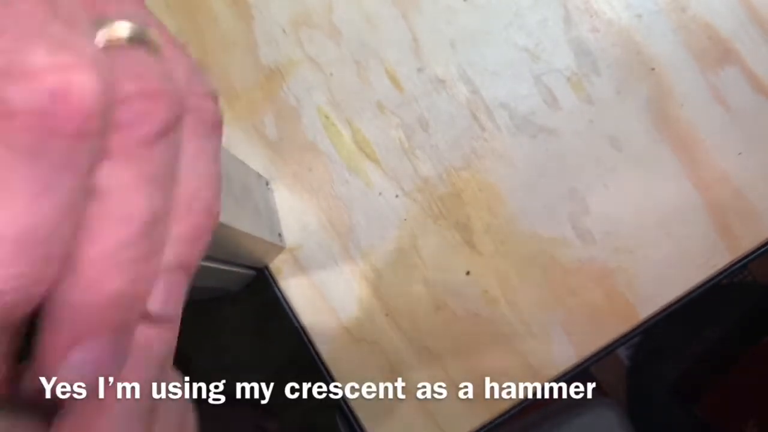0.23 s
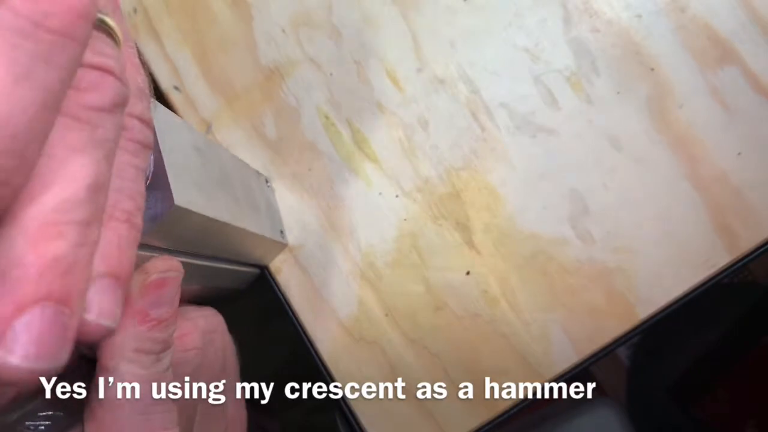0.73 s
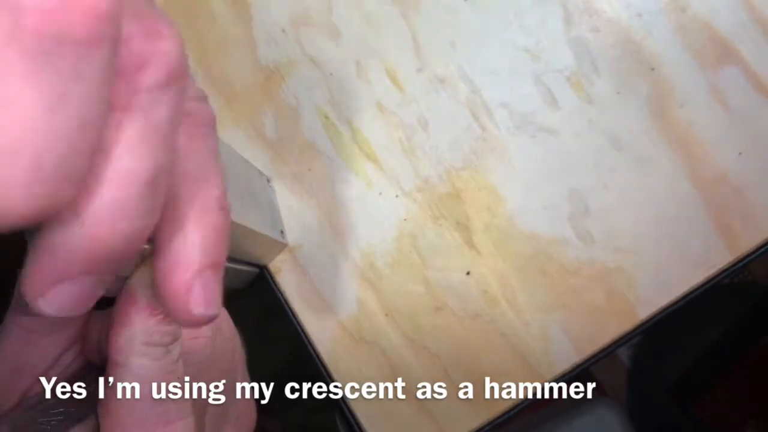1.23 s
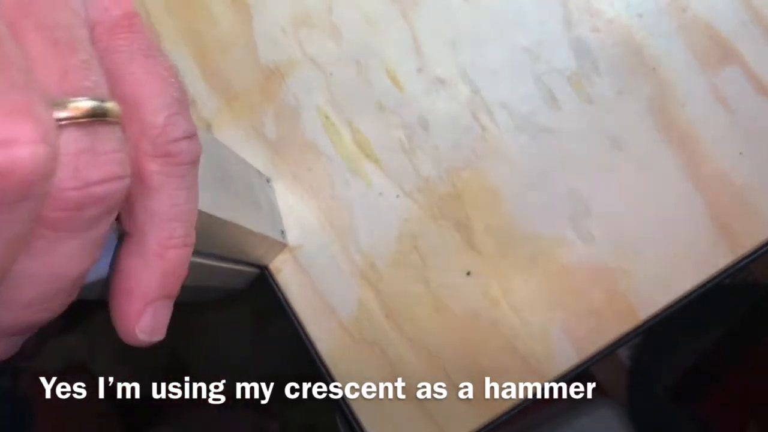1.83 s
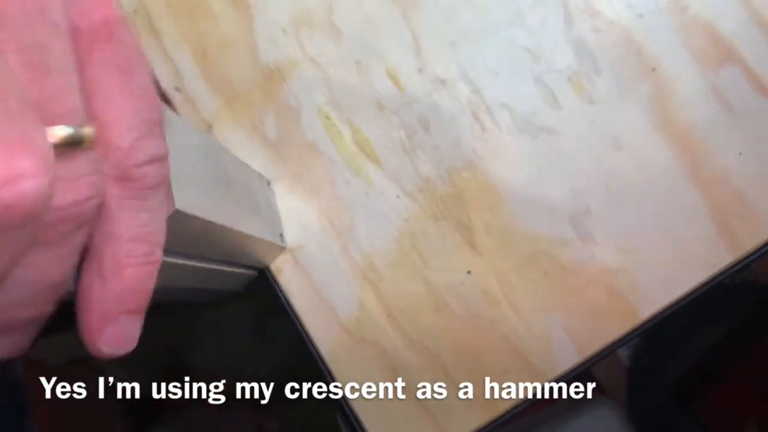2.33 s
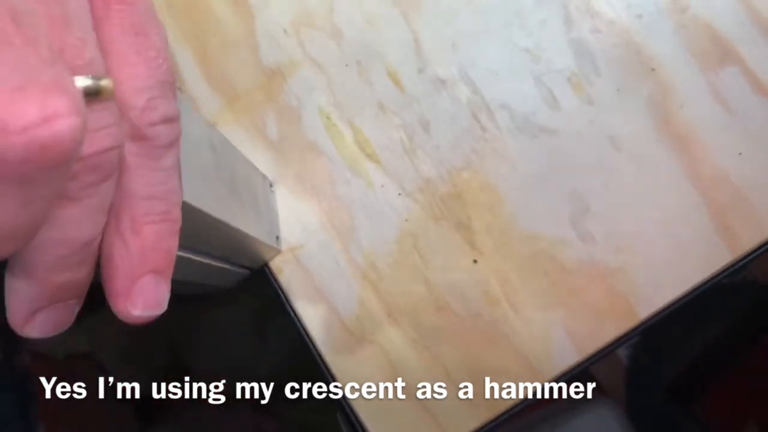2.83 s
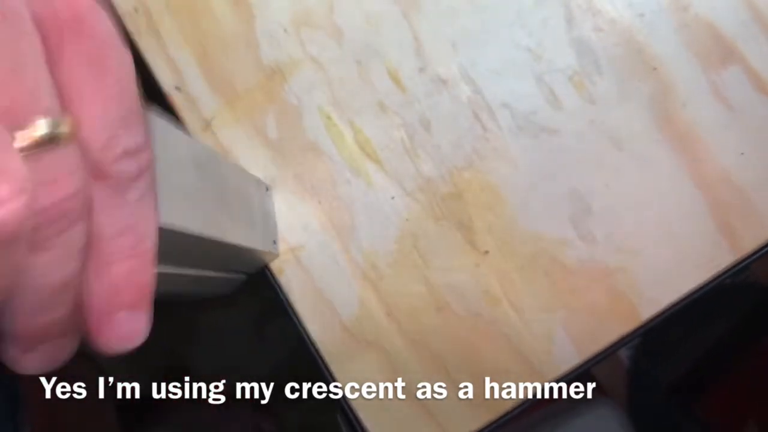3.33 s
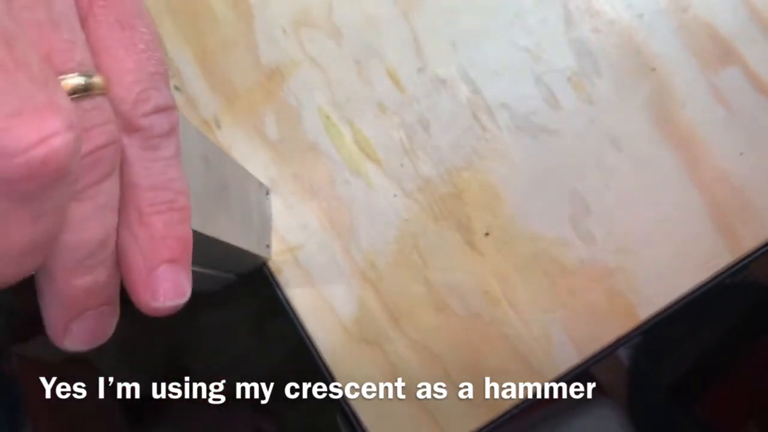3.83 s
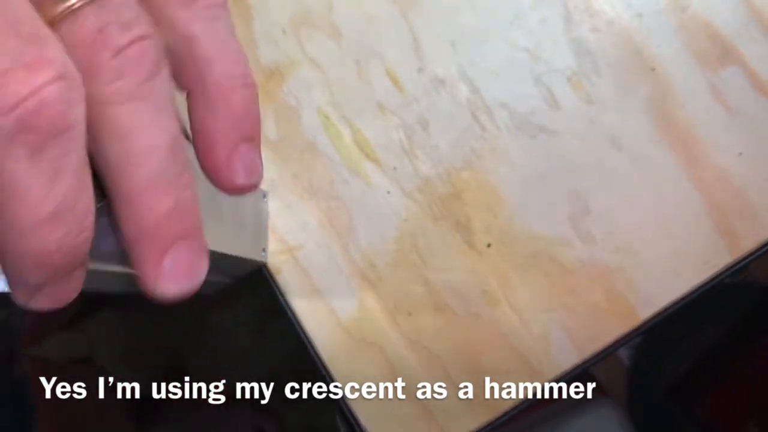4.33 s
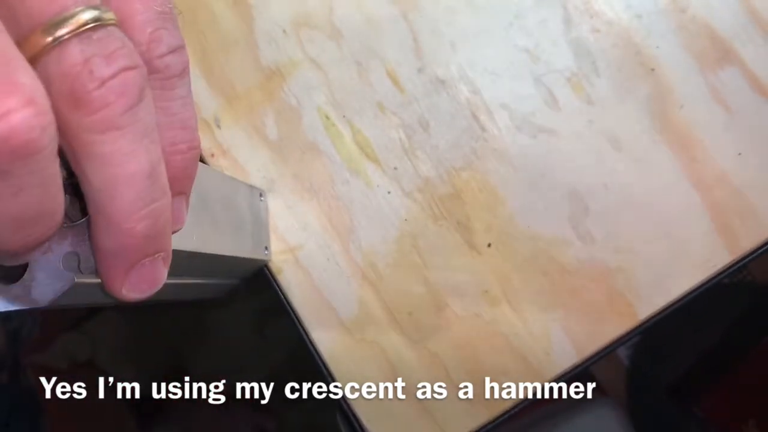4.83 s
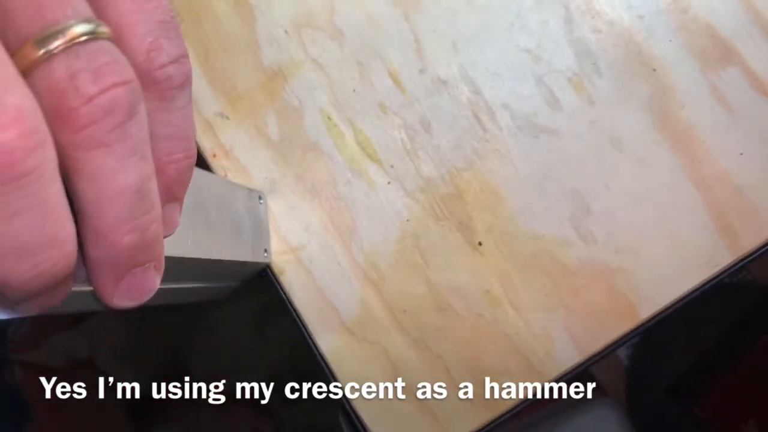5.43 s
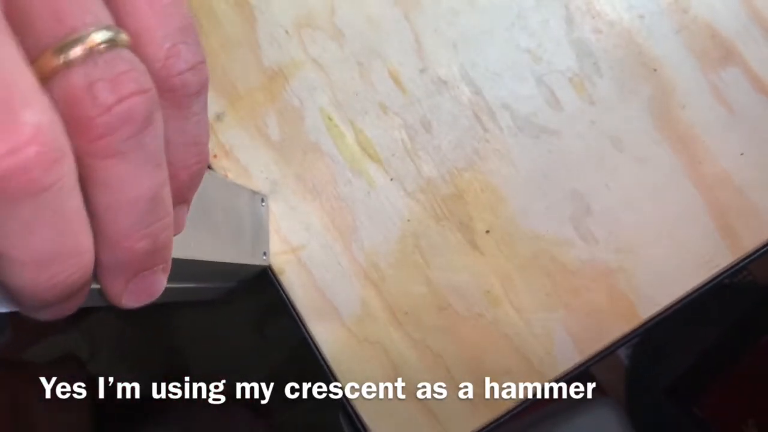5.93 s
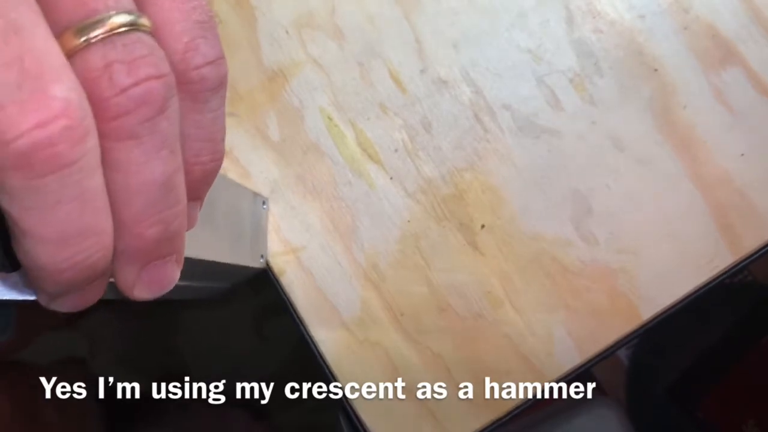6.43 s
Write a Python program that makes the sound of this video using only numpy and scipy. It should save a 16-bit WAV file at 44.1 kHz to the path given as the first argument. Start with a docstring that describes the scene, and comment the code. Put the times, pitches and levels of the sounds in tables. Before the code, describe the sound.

Soft metal handling taps on a wooden bench, then seven hard steady wrench blows on an aluminium block, a pause, and six more.

```python
"""Hammering metal on a bench

A steel wrench hammers an aluminium block on a wooden bench in a small quiet workshop, heard from close by.
Light handling taps come first; then runs of blows, after nearly all of which the block hops and lands again.
Every contact cracks (shaped noise) and thumps the bench (dying sine waves); loosely held metal rings on.
The bench sways on its legs, fingers rustle, and the walls return a short bright tail of sparse echoes."""
import sys
import numpy as np
from scipy import signal
from scipy.fft import rfft, irfft, next_fast_len
from scipy.io import wavfile
from scipy.ndimage import uniform_filter1d

SR = 44100
rng = np.random.default_rng(int(sys.argv[2]) if len(sys.argv) > 2 else 0)


def dump_mix(stems):
    """Bounce the given channels to the path in sys.argv[1] as a 16-bit WAV at rate SR."""
    frames = np.atleast_2d(stems).T  # one column per channel
    limited = np.clip(frames, -1, 1)  # hard clip at full scale
    pcm = np.round(limited * 32767).astype(np.int16)
    wavfile.write(sys.argv[1], SR, pcm)


N = 294147  # length in samples


def amp(db):
    """Turns decibels into a plain multiplier."""
    return 10 ** (np.asarray(db) / 20)


def evened(x):
    """Scales a signal to an average (RMS) strength of 1."""
    return x / np.sqrt(np.mean(x ** 2) + 1e-20)


def read(points, hz):
    """Reads a curve between its points, with pitch on a logarithmic scale."""
    f, value = np.transpose(points)
    return np.interp(np.log(hz + 1), np.log(f + 1), value)


def add(mix, s, sound):
    """Adds a sound to the mix, starting at s seconds."""
    part = mix[:, round(s * SR):][:, :sound.shape[1]]
    part += sound[:, :part.shape[1]]


def dying(x, level_db, t60):
    """Colours x, then lets each of its overlapping octave bands die away at its own speed."""
    length = x.shape[1]
    hz, t = np.fft.rfftfreq(length, 1 / SR), np.arange(length) / SR
    coloured = rfft(x) * amp(level_db(hz))
    out = 0
    for centre in 62.5 * 2. ** np.arange(9):
        share = np.clip(1 - abs(np.log2(hz / centre + 1e-9)), 0, 1)
        band = irfft(coloured * share, length)
        out = out + band * amp(-60 * t / read(t60, centre))
    return out


def ring(modes, spread_db, rise_cycles, narrow_db=0):
    """Damped sines; where the blow lands sets their strengths. The second path hears other phases."""
    hz, db, t60 = np.transpose(modes)[:, :, None]
    t = np.arange(12288) / SR
    luck, turn = rng.standard_normal((2, len(modes), 1))
    # narrow_db: loss per octave away from 260 Hz
    db = db + spread_db * luck - narrow_db * abs(np.log2(hz / 260))
    rise = 1 - np.exp(-t * hz / rise_cycles)
    size = amp(db - 60 * t / t60) * rise
    return np.array([(size * np.sin(2 * np.pi * hz * t + phase)).sum(0) for phase in (0, 3 * turn)])


# Colour of the quiet room. Each row: pitch in Hz, relative strength in dB per Hz.
ROOM_COLOUR = [(25, -24.5), (60, -9.5), (128, -10), (165, -8), (217, -16.5), (390, -19.5), (500, -28.5),
               (523, -9.5), (548, -30.5), (1000, -26), (2200, -38), (4000, -51), (12000, -56.5)]
# Loudness of the room, higher while hands move on the bench. Each row: time in seconds,
# level in dB before the slow lumps are added.
ROOM_LEVEL = [(0.0, -56), (0.162, -68), (1.28, -69.5), (1.5, -71.5)]


def air():
    """The quiet of the room: coloured noise whose level wanders in slow lumps."""
    white = rng.standard_normal((2, N))
    noise = irfft(rfft(white) * amp(read(ROOM_COLOUR, np.fft.rfftfreq(N, 1 / SR))), N)
    lumps = evened(uniform_filter1d(uniform_filter1d(rng.standard_normal(N), 1500), 1500))
    level_db = np.interp(np.arange(N) / SR, *np.transpose(ROOM_LEVEL))
    return evened(noise) * amp(level_db + 0.66 * lumps)


# Fingers scuff over the metal. Each row: time in seconds, level in dB.
FINGER_SCUFF = [(0.0, -70), (0.133, -83), (0.356, -95), (0.48, -100), (0.7, -100)]


def rustle():
    """Fine uneven friction noise, kept between 1000 and 4200 Hz."""
    s, db = np.transpose(FINGER_SCUFF)
    t = np.arange(round(s[-1] * SR)) / SR
    noise = rng.standard_normal((2, len(t)))
    unevenness = evened(uniform_filter1d(rng.standard_normal(len(t)), 300))
    grains = noise * amp(3.2 * unevenness)
    grains = signal.sosfilt(signal.butter(2, [1000, 4200], "band", fs=SR, output="sos"), grains)
    return evened(grains) * amp(np.interp(t, s, db))


# A hand bumps the bench. Each row: start in seconds, push in dB.
HAND_SHOVES = [(0.001, -56), (0.249, -55)]
# The whole bench on its legs, a close pair of notes that beats. Each row: pitch in Hz,
# time to fall by 60 dB in seconds, share of a blow, share of a shove (a minus sign flips the swing).
LEG_SWAY = [(60.49, 1.47, 1, 1), (62.74, 3, -.31, 1)]


def sway():
    """Every push starts the slow modes anew on top of what still swings."""
    blows, shoves = np.zeros((1, N)), np.zeros((1, N))
    for pushes, table in ((blows, WRENCH_BLOWS), (shoves, HAND_SHOVES)):
        for s, *_, push_db in table:
            add(pushes, s, amp([[push_db]]))
    t = np.arange(3 * SR) / SR
    total = 0
    for hz, t60, down, side in LEG_SWAY:
        swing = amp(-60 * t / t60) * np.sin(2 * np.pi * hz * t)
        total = total + signal.fftconvolve((down * blows + side * shoves)[0], swing)[:N]
    return total


# Colour of a crack. Each row: pitch in Hz, relative strength in dB per Hz.
CRACK_COLOUR = [(150, 0), (400, -4), (800, -0.9), (1500, -4), (2500, -9.5), (4500, -9.5), (7000, -9),
                (9500, -6.5), (12500, -12.5), (15500, -13), (16200, -45.5)]
# How fast a crack dies. Each row: pitch in Hz, time to fall by 60 dB in seconds.
CRACK_FADE = [(300, 0.058), (1500, 0.056), (5000, 0.12), (12000, 0.018)]


def crack(db, bright_db, edge_hz=30000):
    """A crunchy burst from countless short metal modes; soft contacts lose the treble above edge_hz."""
    def colour(hz):
        tilt = bright_db * np.log2((hz + 1) / 3000)
        softness = 10 * np.log10(1 + (hz / edge_hz) ** 4)
        return read(CRACK_COLOUR, hz) + tilt - softness

    grit = amp(4.1 * evened(uniform_filter1d(rng.standard_normal(4096), 50)))
    burst = dying(rng.standard_normal((2, 4096)) * grit, colour, CRACK_FADE)
    # each contact favours other groups of modes
    clusters_db = 2.5 * evened(uniform_filter1d(uniform_filter1d(rng.standard_normal(2049), 20), 20))
    burst = irfft(rfft(burst, 4096) * amp(clusters_db), 4096)
    burst[:, 2048:] = 0
    burst *= 1 - np.exp(-np.arange(4096) / SR * edge_hz / 2)  # soft contacts rise more slowly
    return amp(db - 8.0) * burst / np.std(burst[:, :200])  # levelled by its opening moment


# In these three tables crack levels are relative: crack() takes 8 dB off them all.
# The wrench hits the block. Each row: start in seconds, crack level in dB, bench thump level in dB,
# brightness in dB per octave, push on the bench legs in dB.
WRENCH_BLOWS = [(1.9909, -7.5, -17, 0.7, -43), (2.3082, -6, -16, 1.35, -32.5),
                (2.6343, -5.5, -16, 0.6, -30.5), (2.9653, -4.5, -13, 0.6, -29),
                (3.3115, -7, -15.5, 1.4, -33.5), (3.6538, -6, -15.5, 1, -31),
                (3.985, -4.5, -13, 1.05, -33.5), (4.8964, -3.5, -12.5, 1.3, -36.5),
                (5.2345, -4.5, -16, 0.63, -32), (5.5692, -4.5, -14.5, 0.43, -33),
                (5.898, -4, -13, 1.14, -33), (6.2113, -5, -14.5, 0.68, -31), (6.5374, -7, -16, 2, -35.5)]
# The block lands again. Each row: start in seconds, crack level in dB (2 dB less is played),
# bench thump level in dB, brightness in dB per octave.
BLOCK_LANDINGS = [(2.038, -19, -24, -1), (2.393, -12.5, -34, -3), (2.7224, -13.5, -29.5, -1.5),
                  (3.0663, -9.5, -28.5, -2), (3.0988, -32, -29.5, 4.5), (3.3926, -16, -26, -2.5),
                  (3.727, -14, -25.5, -5.5), (4.0647, -16, -36.5, -2.5), (4.9778, -10.5, -25.5, -2.5),
                  (5.3177, -15.5, -28.5, -4), (5.6386, -23.5, -38.5, -9.5), (5.9772, -19.5, -42, 3),
                  (6.2854, -15.5, -29, 0)]
# Light handling taps. Each row: start in seconds, crack level in dB, bench thump level in dB,
# brightness in dB per octave and, where loosely held metal rings on, block and wrench levels in dB.
LIGHT_TAPS = [(0.0565, -53, -64, 0.3), (0.1477, -43, -57.5, -7), (0.2516, -37.5, -49.5, -2.1, -36.5, -88),
              (0.4327, -56, -64, -3, -67.5, -97), (0.511, -61, -56, -4), (0.616, -69.5, -59, -7),
              (0.78, -76, -66, -1), (0.9336, -48, -48.5, -4.5), (1.2126, -33.5, -38, -3.5, -51, -51.5),
              (2.2132, -44.5, -53.5, 6), (2.549, -31, -35, -4), (2.906, -42, -38.5, -4.5),
              (3.884, -39.5, -38.5, -8), (4.346, -31.5, -57.5, -4, -53, -92),
              (4.772, -69, -100, -6, -76, -96), (4.8266, -64.5, -66.5, 4, -67, -93),
              (5.409, -37.5, -37, -1.5)]
# A blow slaps the block down again at once. Each row: delay in seconds (varied by up to a tenth),
# change of level in dB, change of brightness in dB per octave.
BLOCK_CHATTER = [(.0055, -3, 0), (.011, 2, -1.5), (.023, -6, -3.5)]


def metal():
    """The crack of every contact, with the block's quick chatter after each blow."""
    mix = np.zeros((2, N))
    for s, db, _, bright_db, _ in WRENCH_BLOWS:
        add(mix, s, crack(db, bright_db))
        for later, change_db, tilt_db in BLOCK_CHATTER:
            delay = later * rng.uniform(.9, 1.1)
            add(mix, s + delay, crack(db + change_db, bright_db + tilt_db))
    for s, db, _, bright_db in BLOCK_LANDINGS:
        add(mix, s, crack(db - 2, bright_db, edge_hz=3200))
    for s, db, _, bright_db, *_ in LIGHT_TAPS:
        add(mix, s, crack(db, bright_db))
    return mix


# Notes of the wooden bench top. Each row: pitch in Hz, relative level in dB,
# time to fall by 60 dB in seconds.
BENCH_NOTES = [(68, -8, .09), (86, -0.5, 0.1), (101, 3, 0.19), (111.66, -13, 0.51), (155.3, 2.2, 0.14),
               (199, -17, 0.17), (241, -5, 0.2), (281.8, -2.5, 0.18), (308, -1.5, 0.13), (381.9, -10, 0.23),
               (463.6, -6.5, 0.15), (507.2, 0, 0.12), (625, -8, 0.016), (813, -12, 0.18), (1126, -6, 0.062)]


def thump(db, light_db):
    """The swing of the wood; light contacts move mostly its middle modes."""
    return -amp(db) * ring(BENCH_NOTES, spread_db=1.5, rise_cycles=0.86, narrow_db=light_db)


# The block's flat face meets the wood. Each row: pitch in Hz, relative level in dB,
# time to fall by 60 dB in seconds.
FLAT_SLAP = [(215, 1.5, 0.027), (326, -7.5, .025)]
SLAP_DB = -1.5  # dB against the crack level listed for the landing


def wood():
    """The bench answers each contact a moment later; a landing block also slaps it."""
    mix = np.zeros((2, N))
    for table, light_db in ((WRENCH_BLOWS, 0), (BLOCK_LANDINGS, 8), (LIGHT_TAPS, 6.5)):
        for s, _, db, *_ in table:
            add(mix, s + 0.00295, thump(db, light_db))
    for s, db, *_ in BLOCK_LANDINGS:
        add(mix, s, -amp(db + SLAP_DB) * ring(FLAT_SLAP, spread_db=0.92, rise_cycles=0.27))
    return mix


# Notes of the block, and of the wood rubbed beneath it. Each row: pitch in Hz, relative level in dB,
# time to fall by 60 dB in seconds.
BLOCK_NOTES = [(2083, 0, .035), (2799, -12, .15), (3795, -1, .03), (5750, -13, .025), (6500, -12, .07),
               (7500, -9, .025)]
RUBBED_WOOD = [(820, 0, .04), (1150, -2, .03), (1700, -2, .02), (2050, 2, .03), (3500, -5, .02)]


def scrape(length_s, db):
    """Friction noise drives the modes of the block and the wood beneath."""
    length = round(length_s * SR)
    rub = rng.standard_normal((2, length)) * np.hanning(length)
    drive = evened(rub) / np.sqrt(length)
    notes = ring(BLOCK_NOTES, 0.75, 0.71) + 1.6 * ring(RUBBED_WOOD, 1, 0.91)
    return amp(db) * signal.fftconvolve(drive, notes, axes=1)


# Notes of the wrench. Each row: pitch in Hz, relative level in dB, time to fall by 60 dB in seconds.
WRENCH_NOTES = [(1112, -3, .1), (1378, -3, .1), (4237, 3, .18), (4330, -10, .1), (10100, -8, .06)]
# The block is nudged along. Each row: start in seconds, length in seconds, level in dB.
NUDGES = [(0.919, .04, -71), (1.001, .03, -74), (1.101, 0.027, -65)]


def rings():
    """Clear notes of loose metal, tapped or rubbed."""
    mix = np.zeros((2, N))
    loose_taps = (row for row in LIGHT_TAPS if len(row) == 6)
    for s, *_, block_db, wrench_db in loose_taps:
        block = amp(block_db) * ring(BLOCK_NOTES, 1, 0.5)
        wrench = amp(wrench_db) * ring(WRENCH_NOTES, 0.76, 2)
        add(mix, s, block + wrench)
    for s, length_s, db in NUDGES:
        add(mix, s, scrape(length_s, db))
    return mix


# How fast the echoes die. Each row: pitch in Hz, time to fall by 60 dB in seconds.
WALL_FADE = [(80, 0.97), (250, 0.59), (1000, 0.49), (4000, 0.46), (8000, 0.37), (14000, 0.23)]
# Colour of the echoes. Each row: pitch in Hz, relative level in dB.
WALL_COLOUR = [(70, -21.5), (130, -11), (250, -7), (1000, -6.5), (4000, -6), (9000, -12), (15000, -7.5)]


def walls(x):
    """Sparse echoes of random sign, one in every 20 samples, the treble dying first."""
    taps = np.zeros((2, 32768))
    at = np.arange(0, 32740, 20) + rng.integers(0, 20, (2, 1637))
    np.put_along_axis(taps, at, rng.choice([-1., 1.], at.shape), 1)
    taps *= np.sqrt(20 * 14 / (.4 * SR))  # overall strength
    tail = dying(taps, lambda hz: read(WALL_COLOUR, hz), WALL_FADE)
    tail *= 1 - np.exp(-np.arange(32768) / (0.0014 * SR))  # echoes build up
    return signal.fftconvolve(x, tail, axes=1)[:, :N]


def scene():
    """Adds all sounds along two sound paths to the microphone."""
    hard, deep, clear = metal(), wood(), rings()
    mix = hard + deep + clear + sway() + air()
    # bench and small notes are close: less comes off the walls
    mix += walls(hard + deep / 2 + clear * .3)
    add(mix, 0, rustle())
    return mix


# How alike left and right are. Each row: pitch in Hz, likeness from 0 to 1.
LIKENESS = [(60, 1), (300, 0.95), (650, 0.82), (1000, 0.47), (1400, 0.033), (5200, 0.05), (7000, 1),
            (8500, 1), (12500, 0.59), (15500, 0.9358)]
# The right port is late in the bass. Each row: pitch in Hz, lag in radians.
RIGHT_LAG = [(20, 0), (450, .6), (620, 1.3), (760, 3.1), (1200, 5), (2000, 6.5), (3000, 9.4)]
# Balance of the two ports. Each row: pitch in Hz, left above right in dB.
LEFT_ABOVE_RIGHT = [(60, 0), (120, -2), (240, 1.5), (480, -2.5), (950, 5), (1890, 1), (3770, 1), (7520, -2),
                    (15000, 1.5)]
TREBLE_LEAD_S, IN_STEP_HZ = 1 / 4870, 10985  # right is early in the treble; pitch where both agree
EDGE_HZ = 16900  # upper band limit


def record(dry):
    """Two ports share part of the sound with a delay; the loudest peaks are rounded; then the band limit."""
    size = next_fast_len(N + 4096)
    hz = np.fft.rfftfreq(size, 1 / SR)
    left, other = rfft(dry, size)
    late = np.exp(-1j * read(RIGHT_LAG, hz))
    early = np.exp(2j * np.pi * (hz - IN_STEP_HZ) * TREBLE_LEAD_S)
    treble = np.clip((hz - 3000) / 2000, 0, 1)  # crossover from bass lag to treble lead
    same = np.clip(read(LIKENESS, hz), 0, 1) * ((1 - treble) * late + treble * early)
    right = same * left + np.sqrt(1 - abs(same) ** 2 + 1e-9) * other
    balance = amp(read(LEFT_ABOVE_RIGHT, hz) * [[.5], [-.5]])  # half up on one side, half down on the other
    ports = irfft(np.array([left, right]) * balance, size)[:, :N]
    low_cut = signal.butter(3, 42, "high", fs=SR, output="sos")  # little deep bass
    rounded = np.tanh(signal.sosfilt(low_cut, ports))
    band_limit = signal.firwin(511, EDGE_HZ, window=("kaiser", 9), fs=SR)
    return signal.oaconvolve(rounded, band_limit[None], "same")


dry = scene()
out = record(dry)
dump_mix(out)
```